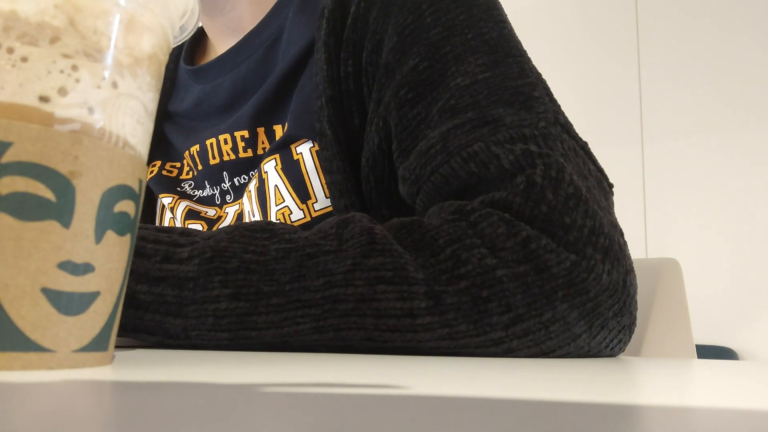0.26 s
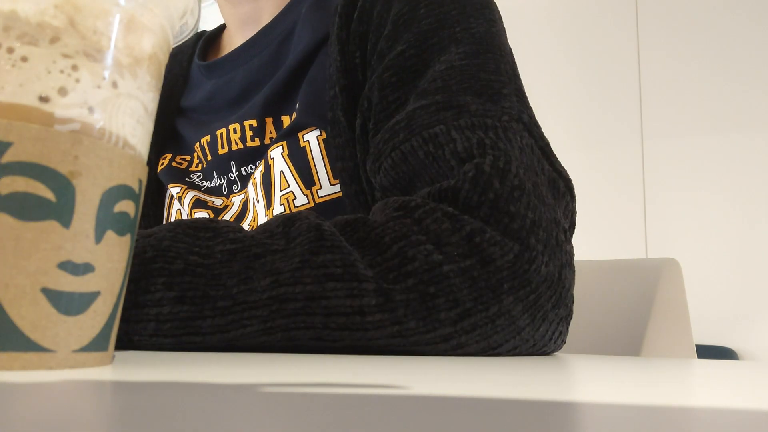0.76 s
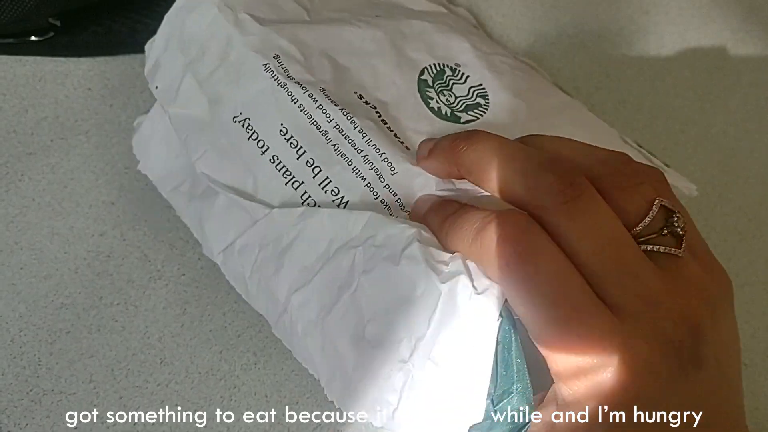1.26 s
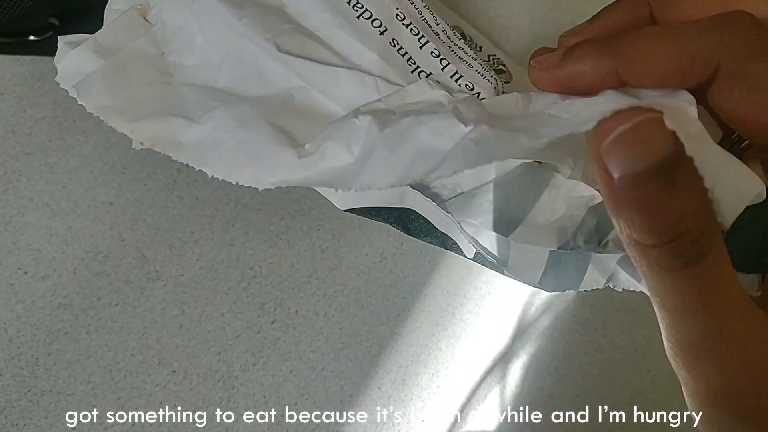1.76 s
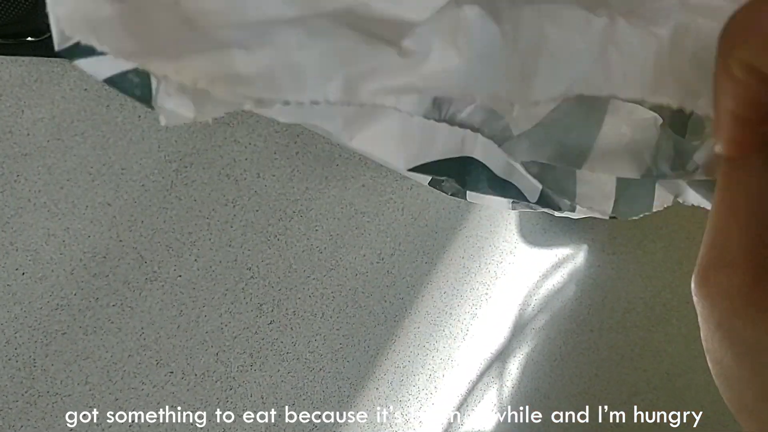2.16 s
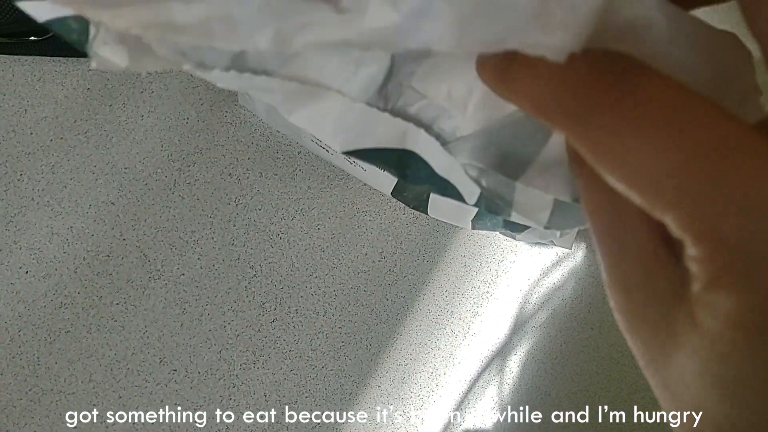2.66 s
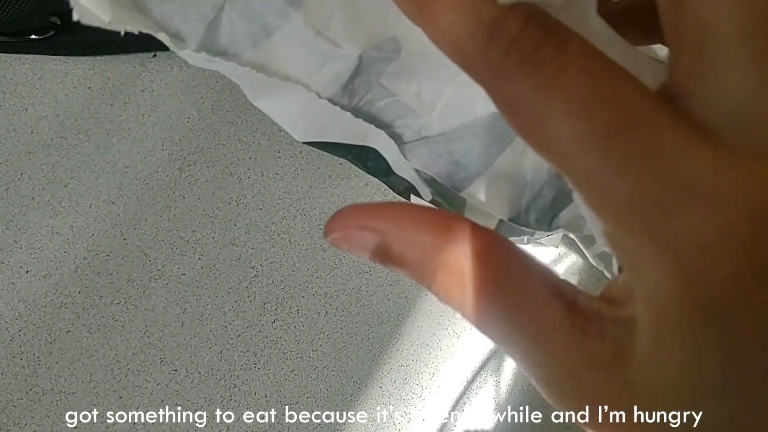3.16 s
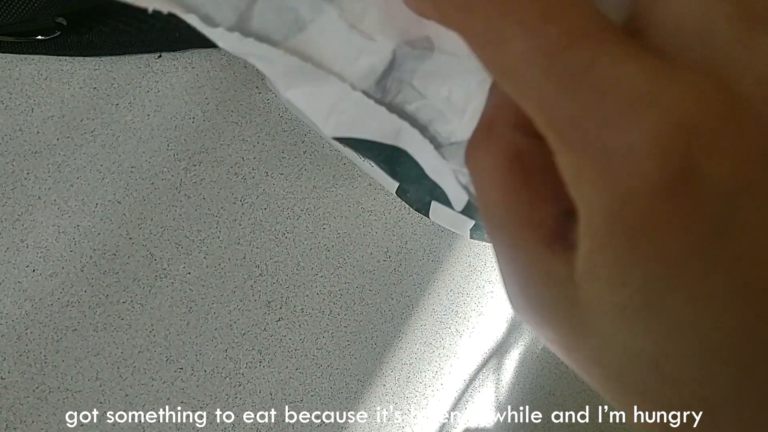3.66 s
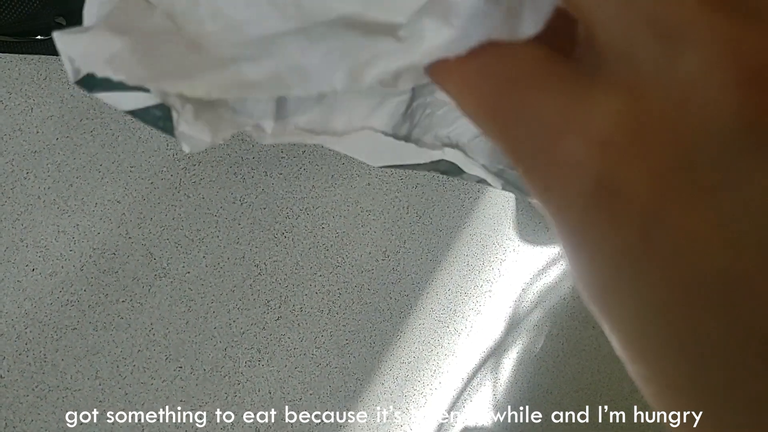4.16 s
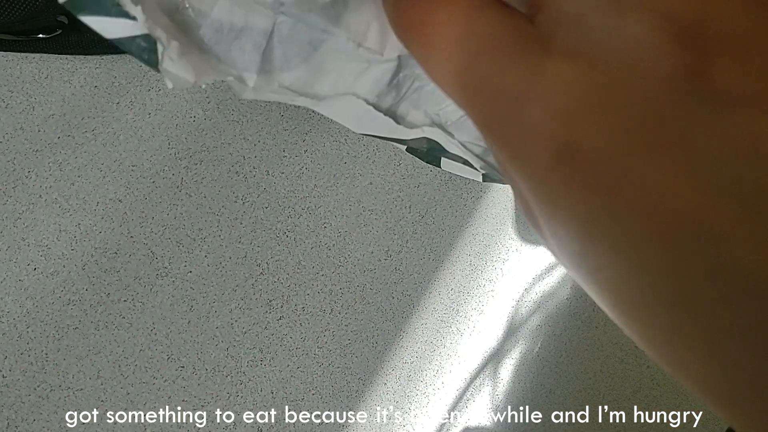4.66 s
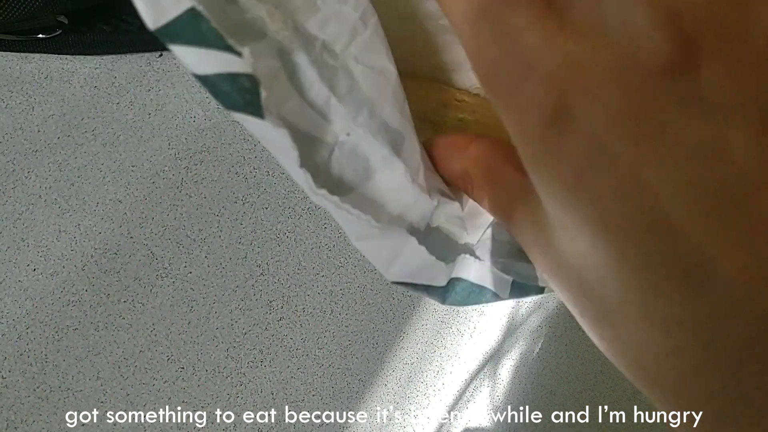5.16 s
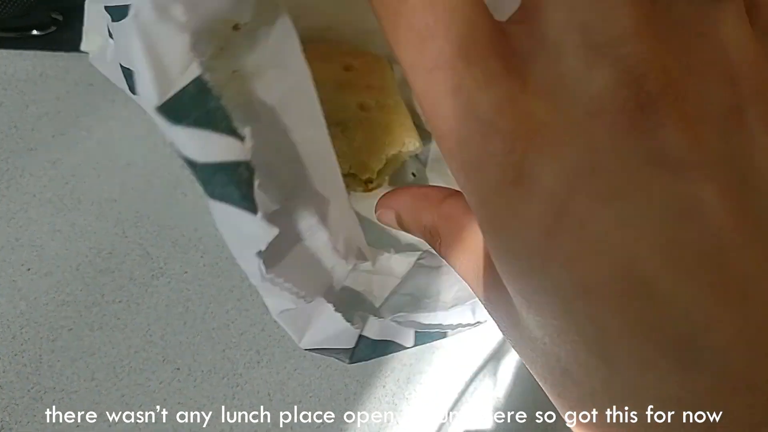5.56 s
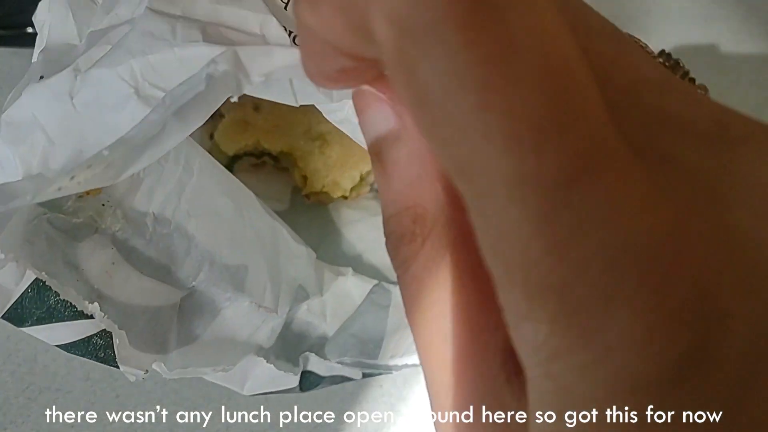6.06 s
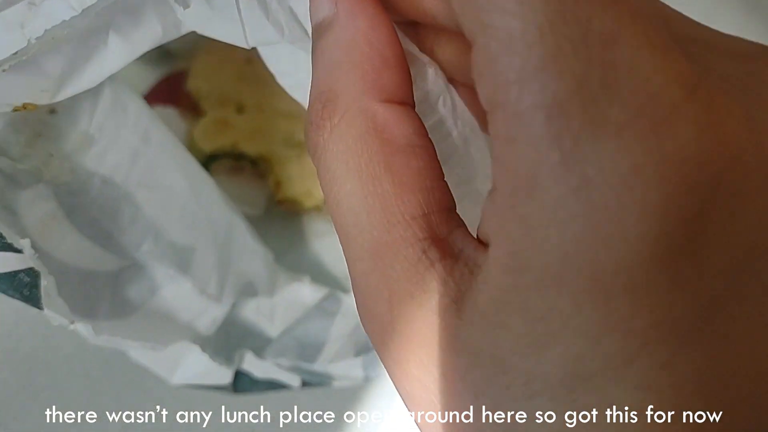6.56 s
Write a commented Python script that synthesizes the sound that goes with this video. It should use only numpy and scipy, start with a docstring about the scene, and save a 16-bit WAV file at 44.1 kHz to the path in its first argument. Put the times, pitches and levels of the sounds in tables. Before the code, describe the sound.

Quiet room air and a few faint taps, then a paper pastry bag crackles loudly in uneven bursts under working fingers, fading to soft rubs.

```python
"""A paper pastry bag is worked open by fingers on a table, close to a phone in a quiet office. Creases snap as
bright bursts and ring the panels beside them; fingers press the bag against the table in dull knocks. A rustle
of countless random buckles and sliding hiss follows the hand and dies away; soft strokes end it. Filtered room
noise and a few taps, ringing in short modes, come first; a low drone lies under the paper."""
import sys
import numpy as np
from scipy import signal
from scipy.fft import rfft, irfft
from scipy.io import wavfile
from scipy.ndimage import uniform_filter1d

SR = 44100
rng = np.random.default_rng(int(sys.argv[2]) if len(sys.argv) > 2 else 0)


def generate_wav(signal):
    """Clip the signal to [-1, 1] and save it as 16-bit WAV at the path in sys.argv[1]."""
    frames = np.transpose(np.atleast_2d(signal))
    scaled = np.clip(frames, -1, 1) * 32767
    pcm = np.round(scaled).astype(np.int16)
    wavfile.write(sys.argv[1], SR, pcm)


N = 299880
TIME_S = np.arange(N) / SR

# Ventilation and distant air. Each row: frequency in Hz, relative density in dB per Hz.
AIR_COLOUR = [(18, -74.5), (30, -51.5), (189, -24.5), (311, -7), (649, -6), (913, -10), (988, -11),
              (1960, -20.5), (2230, -20.5), (4530, -30), (16000, -34.5)]
# Difference between the channels of the air. Each row: frequency in Hz, gain in dB.
AIR_SIDE_COLOUR = [(10, -8.0), (110, -12.5), (250, -18.0), (700, -13), (2400, -5), (4400, 4.0), (22000, -3.5)]
AIR_DB, AIR_END_S = -64, 1.13
# Drone of the building. Each row: frequency in Hz, gain in dB.
HUM_COLOUR = [(30, -23.0), (70, -15.0), (90, -1), (190, -7), (400, -17.0)]

# Light taps at the table. Each row: start in seconds, level in dB.
TAPS = [(0.264, -61.5), (.425, -58.5), (0.9842, -46), (0.986, -48), (1.026, -55)]
# Modes of the tapped thing. Each row: frequency in Hz, relative level in dB, 60 dB decay time in seconds.
TAP_MODES = [(528, -8, .06), (834, -4.5, 0.062), (1506, 0, 0.051), (2280, -5, 0.069), (3180, -7, 0.0256),
             (3440, -11, 0.032)]

# Fingertip strokes on the paper. Each row: start in seconds, length in seconds, level in dB.
STROKES = [(6.25, 0.053, -70), (6.305, 0.033, -63.5), (6.365, 0.043, -62), (6.485, 0.026, -68.5),
           (6.55, .17, -78)]
# Colour of a stroke. Each row: frequency in Hz, gain in dB.
STROKE_COLOUR = [(400, -4), (2500, -7), (3100, -0.5), (3800, -5.5), (5000, -1.5), (6000, -7.5), (9500, -8),
                 (16000, -19)]

# Dull knocks as fingers push the bag against the table; the row at 2.24 s is the long ring of the panel #
# beside the loud crease there. Each row: start in seconds, level in dB before trim, centre in Hz.
KNOCKS = [(1.289, -43, 738), (1.34, -40.5, 810.0), (1.403, -37.5, 845), (1.467, -46.5, 850),
          (1.659, -43, 492), (1.679, -39, 676), (1.829, -49, 793), (2.24, -45, 1587), (2.244, -59, 487),
          (2.287, -44.5, 815), (2.428, -51.5, 400), (3.097, -52, 883), (3.605, -46.5, 476.4),
          (3.92, -49, 474), (3.95, -37.5, 540), (4.357, -53, 386), (4.816, -39, 639), (6.159, -57, 490)]

# Hand movements that crumple or slide the paper. Each row: start in seconds, length in seconds,
# sheet level in dB, crisp treble over the sheet in dB, table rumble over the sheet in dB (before trims).
SQUEEZES = [(1.12, 0.074, -53.5, -2.0, -12), (1.197, 0.1045, -49.5, -0.5, -15.0),
            (1.324, 0.15, -47.0, 2.5, -20.0), (1.467, 0.14, -50, -0.5, -16),
            (1.617, 0.18, -48.0, -0.5, -18), (1.806, 0.097, -49.5, 1.0, -18), (1.9, 0.13, -47, 5, -18),
            (2.059, 0.15, -47, 2, -22.5), (2.205, 0.077, -46.0, 6.0, -16.5), (2.302, 0.16, -56, -5, -18),
            (2.408, 0.11, -52.0, 2.0, -15), (2.562, 0.11, -64.0, 1.5, -8), (2.655, 0.11, -56, 1, -12.0),
            (2.776, 0.064, -46.0, 2.5, -11), (2.91, 0.071, -47.0, 1.5, -11.5),
            (2.978, 0.068, -42.5, 1.0, -17.0), (3.077, 0.04, -48, -1, -14),
            (3.134, 0.163, -56.0, -1.5, -20), (3.291, 0.25, -50, 7.5, -15),
            (3.561, 0.039, -52.5, 8.5, -11.5), (3.665, 0.056, -51.0, 9.0, -16),
            (3.75, 0.065, -49.5, 5.5, -13), (3.797, 0.089, -56, -6.0, -11), (3.892, 0.11, -51.5, 0.0, -13),
            (4.012, 0.1, -52.0, 7.0, -13.5), (4.193, 0.13, -61.5, 3, -8), (4.326, 0.032, -52.0, 2.0, -8.5),
            (4.427, 0.15, -71, 0, -2), (4.54, 0.063, -57, 12.5, -11.5), (4.637, 0.13, -54.0, 5.0, -11),
            (4.807, 0.036, -43.0, 2.5, -16), (4.894, 0.075, -50, -4.5, -14.5),
            (4.963, 0.23, -43.5, 4.0, -14.5), (5.169, 0.12, -41.5, 8.0, -12),
            (5.304, 0.14, -44.5, 4.5, -13.5), (5.463, 0.166, -56, 5, -9.5), (5.624, 0.04, -50.0, 4.5, -8.5),
            (5.694, 0.23, -67, 14, -12), (5.91, 0.18, -69, 6.5, -10), (6.108, 0.059, -65.5, 1, -5)]
# Each movement takes hold quickly, builds a little, then the paper settles.
ATTACK_S, BUILD_DB, SETTLE_DB_PER_S = .028, 2.5, 210
# Colours of the three parts of the rustle. Each row: frequency in Hz, gain in dB.
CRISP_COLOUR = [(2500, -14.5), (4000, -7), (5500, -7), (8600, 0), (11000, -2), (13500, -7.5), (16000, -9.5)]
SHEET_COLOUR = [(280, -12.5), (500, 1), (670, -5.5), (870, 0.5), (1200, -3.5), (1750, -1.5), (2750, -1.5),
                (3500, -9.5), (5500, -22)]
RUMBLE_COLOUR = [(25, -22), (60, -11), (92, 1), (170, -0.5), (235, 3.5), (350, 2.5), (450, -4), (750, -20)]

# Small creases that give way at random.
CREASES_PER_S, CREASES_FROM_S, CREASES_TO_S = 45, 1.14, 5.72
# Loudest creases. Each row: start in seconds, crack level in dB and panel level in dB (before trims),
# panel centre in Hz, left minus right in dB (the panel takes half of it).
SNAPS = [(1.1197, -65, -50, 4150, 2), (1.1353, -52, -42.5, 2320, 8), (1.1515, -42, -48, 1510, -1),
         (1.1694, -42, -59, 1810, 7), (1.1867, -41.5, -52, 2630, 6), (1.2543, -35.5, -63, 1210, -2),
         (1.2775, -29, -36, 1300, 6), (1.34, -31.5, -40, 1450, 3), (1.372, -43, -38, 2200, -1),
         (1.3913, -46, -32, 2230, 9), (1.4036, -28.5, -40, 1250, 2), (1.4648, -37.5, -55, 1700, -13),
         (1.6502, -56, -43, 1965, 13), (1.6605, -32.5, -37.5, 3050, 9), (1.6788, -34, -35.5, 1840, 3),
         (1.7417, -44, -39.5, 3240, 1), (1.7875, -40, -56, 2260, 6), (1.802, -38, -45, 2700, 4),
         (1.8294, -46.5, -36.5, 2520, 23), (1.862, -34.5, -45, 1650, 6), (1.8829, -34.5, -41, 1930, 4.5),
         (1.9244, -38.5, -59, 2440, 6), (1.9554, -30.5, -43, 1820, 8), (1.9611, -30.5, -43.5, 2430, -1),
         (2.0149, -36.5, -42, 1830, -4), (2.0998, -38, -39, 2160, 27), (2.1068, -33, -47, 2119, -3),
         (2.2144, -32, -45, 1850, 4), (2.2434, -27, -25, 1805, -3), (2.2529, -31, -42.5, 1910, 14.5),
         (2.5205, -35.5, -41.5, 2460, 7), (2.589, -41, -44.5, 2597, 2), (2.714, -42, -48.5, 2620, 8.5),
         (2.741, -46, -68, 1800, 4), (2.8428, -35, -46, 1920, 11), (2.8496, -34, -45, 2320, 16),
         (2.856, -33, -48, 1840, 1), (3.0559, -30.5, -36, 1090, 16), (3.094, -31.5, -33, 1471, 12),
         (3.315, -36, -44, 2500, 9), (3.3379, -43, -40, 1459, 12), (3.3514, -27.5, -40.5, 2018, 3),
         (3.374, -26.5, -39, 2080, 8), (3.383, -35, -48.5, 3100, 6), (3.3961, -29.5, -44, 2580, 4),
         (3.481, -31, -35.5, 3500, 10), (3.5007, -33, -41.5, 2248, 6), (3.509, -39, -38, 2640, 17),
         (3.536, -30.5, -46, 1994, 6), (3.577, -36.5, -50, 2296, 10), (3.6062, -38, -56, 2328, 12),
         (3.645, -33.5, -47, 2654, 10), (3.6536, -32.5, -47, 1652, 5), (3.7475, -40, -54, 1880, 13),
         (3.7723, -34.5, -39, 3181, 8), (3.8075, -33.5, -44, 2383, 9), (3.92, -49, -47, 1491, 6),
         (3.9466, -41.5, -35, 1625, 10.5), (4.067, -40.5, -60, 2400, 11), (4.147, -41.5, -51, 2703, 12),
         (4.3024, -43.5, -44, 1613, 5), (4.3433, -36, -46, 2113, 9), (4.358, -37.5, -40, 1653, 5),
         (4.4591, -46.5, -60.5, 1640, 3), (4.5852, -35.5, -49, 2820, 15), (4.648, -36, -64, 2714, 11.5),
         (4.6614, -40, -44.5, 2460, 10), (4.6894, -35, -52, 1559, 7), (4.721, -34.5, -46.5, 1975, 7),
         (4.8158, -38, -31.5, 1797, 2), (4.8352, -34.5, -52, 1430, 10), (4.9969, -32.5, -38, 2924, 3),
         (5.0095, -29, -42, 2299, 13), (5.0495, -28.5, -35, 2831, 7), (5.0941, -35, -35.5, 3270, 9),
         (5.1395, -32, -38.5, 2435, 12), (5.216, -27, -41, 1942, 12), (5.258, -26.5, -36, 2250, 8),
         (5.2798, -30, -42, 1720, 3), (5.313, -32.5, -39, 2630, 0), (5.3378, -33, -36.5, 2720, 6),
         (5.357, -31, -35, 1636, 11.5), (5.3654, -34.5, -40, 1960, 3), (5.3859, -36, -40, 3700, -1),
         (5.4048, -28.5, -35, 2310, 9), (5.4212, -44, -31.5, 3413, -3), (5.432, -34.5, -39, 1560, 4),
         (5.4448, -30.5, -39, 2340, 11), (5.4906, -36, -35.5, 1610, 13), (5.5011, -32, -48.5, 2732, 6),
         (5.5288, -34.5, -42.5, 1688, 8), (5.5685, -40, -42.5, 2830, 12), (5.6232, -36.5, -50, 1831, 17),
         (5.7974, -39.5, -75, 3140, 10), (5.8383, -43.5, -63, 2520, 11), (5.857, -39.5, -70, 2810, 9),
         (6.0758, -70.5, -52.5, 2590, 8), (6.1604, -48.5, -64, 1210, 10)]
# A tight crease moves little paper and cracks higher; CRACK_HZ is for crack and panel equally loud.
CRACK_HZ, CRACK_OCT_PER_DB, CRACK_SCATTER_OCT = 7990, 0.02, .07

PORT_LAG_SAMPLES = 7
TOP_HZ = 16100


def undb(db):
    """Decibels to gain."""
    return 10 ** (np.asarray(db) / 20)


def unit(x):
    """Scale to rms 1 over all channels."""
    return x / np.sqrt(np.mean(x ** 2) + 1e-20)


def colour(x, points):
    """Filter by a spectrum of (Hz, dB) points; outside them -60 dB."""
    points_hz, points_db = np.transpose(points)
    size = x.shape[-1]
    hz = np.arange(size // 2 + 1) * SR / size
    gain_db = np.interp(np.log(hz + 1), np.log(points_hz), points_db, left=-60, right=-60)
    return irfft(rfft(x) * undb(gain_db), size)


def resonate(x, hz, q):
    """One broad resonance, applied twice for steep skirts."""
    top_hz = .4 * SR
    b, a = signal.iirpeak(min(hz, top_hz), max(q, hz / top_hz), SR)
    return signal.lfilter(b, a, signal.lfilter(b, a, x))


def pan(left_minus_right_db):
    """Left and right gains of constant power."""
    return unit(undb(np.array([[left_minus_right_db], [-left_minus_right_db]]) / 2))


def add(out, start_s, x):
    """Mix x into out from start_s."""
    i = int(start_s * SR)
    out[:, i:i + x.shape[1]] += x[:, :N - i]


def burst_level(x, db, size=256):
    """Give each channel of a burst the energy of 6 ms at db."""
    return x * undb(db) * np.sqrt(size / np.sum(x ** 2, axis=1, keepdims=True))


def flutter(rise_s, decay_s, likeness, size=1024):
    """Bending waves scatter through creased paper: a short noisy burst that reaches the left port first."""
    t = np.arange(size) / SR
    noise = rng.standard_normal((3, size))
    share = np.clip(likeness, 0, 1)  # power common to both ports
    pair = share ** .5 * noise[0] + (1 - share) ** .5 * noise[1:]
    left, right = pair * (1 - np.exp(-t / rise_s)) ** 2 * np.exp(-t / decay_s)
    return np.array([left, np.roll(right, PORT_LAG_SAMPLES)])


def movement(start_s, length_s, db):
    """Amplitude of one movement of the hand: attack, a building hold, release."""
    t = TIME_S - start_s
    build_db = BUILD_DB * (np.clip(t / length_s, 0, 1) - .5)
    settle_db = SETTLE_DB_PER_S * np.maximum(t - length_s, 0)
    return np.clip(t / ATTACK_S, 0, 1) * undb(db + build_db - settle_db)


def effort(moves):
    """Level in dB of overlapping movements (start, length, dB); their powers add."""
    return 10 * np.log10(sum(movement(*move) ** 2 for move in moves) + 1e-16)


def air(after_db=-27):
    """Soft ventilation noise, alike in both channels in the bass; it drops away as the paper starts."""
    mid, side = rng.standard_normal((2, N))
    side = colour(side, AIR_SIDE_COLOUR)
    noise = unit(colour(mid + side * np.array([[1], [-1]]), AIR_COLOUR))
    return noise * undb(AIR_DB + np.interp(TIME_S, [AIR_END_S, AIR_END_S + 0.079], [0, after_db]))


def hum(hum_db=-77.0):
    """A low noisy drone of the building lies under the paper, from the time the air drops."""
    drone = unit(colour(rng.standard_normal((1, N)), HUM_COLOUR))
    return drone * undb(hum_db) * (TIME_S > AIR_END_S) * pan(2)


def taps(size=8192):
    """Small knocks ring a few short modes, with a dry tick and no bass."""
    out, t = np.zeros((2, N)), np.arange(size) / SR
    high_pass = signal.butter(2, 330, "high", fs=SR)
    for start_s, db in TAPS:
        ring = np.zeros((2, size))
        for hz, mode_db, t60_s in TAP_MODES:
            phase = rng.normal(0, 1, (2, 1))
            ring += undb(mode_db - 60 * t / t60_s) * np.sin(2 * np.pi * hz * t + phase)
        tick = resonate(rng.standard_normal((2, size)) * np.exp(-t / 0.0018), 2600, q=0.88)
        add(out, start_s, burst_level(signal.lfilter(*high_pass, ring + 6 * tick), db))
    return out


def stroke():
    """Skin sliding over paper gives a soft, even swish."""
    swish = unit(colour(rng.standard_normal((2, N)), STROKE_COLOUR))
    return swish * undb(effort(STROKES)) * pan(4.13)


def knocks(trim_db=1.5):
    """Fingers push the bag against the table: a dull papery knock."""
    out = np.zeros((2, N))
    for start_s, db, hz in KNOCKS:
        knock = resonate(flutter(rise_s=.0006, decay_s=0.0048, likeness=0.99), hz, q=.85)
        add(out, start_s, burst_level(knock, db + trim_db) * pan(2.0))
    return out


def buckles(rate_per_s, spread_db, decay_s, likeness, slide_db, centre_hz, count=20):
    """Tiny buckles of very unequal size, on facets that each have their own pitch, above the hiss of sliding paper."""
    out = np.zeros((2, N))
    for octave in np.linspace(-1, 1, count):
        pops = np.zeros(N)
        at = np.flatnonzero(rng.random(N) < rate_per_s / count / SR)
        size_db = spread_db * np.minimum(rng.exponential(size=len(at)), 2)
        pops[at] = undb(size_db) * rng.choice([-1, 1], len(at))
        burst = flutter(rise_s=0.00066, decay_s=decay_s, likeness=likeness)
        facet = resonate(burst, centre_hz * 2 ** octave, q=1.84) + 0.16 * burst
        facet = burst_level(facet, 0) * pan(3 * rng.standard_normal())
        out += signal.oaconvolve(pops[None], facet, axes=1)[:, :N]
    # even out the loudness over about 60 ms, so that no chance buckle stands out
    local_power = uniform_filter1d(np.mean(out ** 2, axis=0), size=2600)
    out /= np.sqrt(local_power + 0.033 * local_power.mean())
    slide = undb(slide_db)
    return (out + slide * rng.standard_normal((2, N))) / np.sqrt(1 + slide ** 2)


def crease(crack_db, panel_db, panel_hz, side_db):
    """A crease pops through with a bright crack; the panel beside it rings, the longer the lower it is."""
    octaves = CRACK_OCT_PER_DB * (crack_db - panel_db) + CRACK_SCATTER_OCT * rng.standard_normal()
    crack_decay_s = 0.0013 * undb(rng.standard_normal())
    crack = flutter(rise_s=0.00036, decay_s=crack_decay_s, likeness=0.046)
    crack = resonate(crack, CRACK_HZ * 2 ** octaves, q=1.22)
    panel = flutter(rise_s=0.00059, decay_s=0.0013 + 0.57 / panel_hz, likeness=0.67)
    panel = resonate(panel, panel_hz, q=0.953)
    return burst_level(crack, crack_db) * pan(side_db) + burst_level(panel, panel_db) * pan(.5 * side_db)


def small_creases(crisp_db, sheet_db, crack_db=-3.0, panel_db=-6.5, scatter_db=3.0, panel_hz=2100, side_db=5):
    """Lesser creases tick between the big ones, as loud as the hand is working."""
    out = np.zeros((2, N))
    for slot_s in np.arange(CREASES_FROM_S, CREASES_TO_S, 1 / CREASES_PER_S):
        start_s = slot_s + rng.random() / CREASES_PER_S
        size, pitch, side = np.clip(rng.standard_normal(3), -2, 2)
        i, size_db = int(start_s * SR), scatter_db * size
        tick = crease(crisp_db[i] + crack_db + size_db, sheet_db[i] + panel_db + size_db,
                      panel_hz * 2 ** (.4 * pitch), side_db + 4 * side)
        add(out, start_s, tick)
    return out


def rustle(crisp_trim_db=-0.96, sheet_trim_db=-0.63, rumble_trim_db=0.3):
    """Harder handling makes more buckles a second and louder creases; at the end the fingers mostly slide."""
    start_s, length_s, level_db, treble_db, bass_db = np.transpose(SQUEEZES)
    sheet_db = effort(zip(start_s, length_s, level_db))
    crisp_db = effort(zip(start_s, length_s, level_db + treble_db))
    rumble_db = effort(zip(start_s, length_s, level_db + bass_db))
    rate_per_s = 850 * undb(.25 * (crisp_db + 45))
    slide_db = np.interp(TIME_S, [5.6, 5.8], [-1, 8])
    fine = buckles(rate_per_s, spread_db=7.5, decay_s=0.0015, likeness=0.057,
                   slide_db=slide_db, centre_hz=8060)
    broad = buckles(rate_per_s, spread_db=4.5, decay_s=0.0018, likeness=0.8,
                    slide_db=slide_db - 3.5, centre_hz=1423.0)
    sway = broad + 0.27 * broad.mean(axis=0)  # the lowest sway is more alike at both ports
    crisp = unit(colour(fine, CRISP_COLOUR)) * undb(crisp_db + crisp_trim_db) * pan(5.4)
    sheet = unit(colour(1.7 * fine + broad, SHEET_COLOUR)) * undb(sheet_db + sheet_trim_db) * pan(2.6)
    rumble = unit(colour(sway, RUMBLE_COLOUR)) * undb(rumble_db + rumble_trim_db) * pan(3.8)
    return crisp + sheet + rumble + small_creases(crisp_db, sheet_db)


def snaps(crack_trim_db=0.8, panel_trim_db=0.74):
    """The big creases, one by one, each a crack with its panel."""
    out = np.zeros((2, N))
    for start_s, crack_db, panel_db, panel_hz, side_db in SNAPS:
        add(out, start_s, crease(crack_db + crack_trim_db, panel_db + panel_trim_db, panel_hz, side_db))
    return out


def table_bounce(x, share=0.33, moves_per_s=9):
    """The table returns the paper's sound a moment later; as the bag moves the delay wanders and the colour shifts."""
    steps_s = np.arange(0, TIME_S[-1] + 1, 1 / moves_per_s)
    bounced = []
    for side in x:
        delay_s = np.interp(TIME_S, steps_s, rng.uniform(.00015, .0008, len(steps_s)))
        bounced.append(np.interp(TIME_S - delay_s, TIME_S, side))
    return (x + share * np.array(bounced)) / np.sqrt(1 + share ** 2)


def office(x, t60_s=0.087, wet_db=-16, size=16384):
    """Table, hands and walls return a short diffuse tail, weak in the top treble."""
    t = np.arange(size) / SR
    decay = undb(-60 * t / t60_s) * (1 + 5 * np.exp(-t / 0.0081)) * (t > .002)
    tail = signal.lfilter(*signal.butter(1, 7000, fs=SR), rng.standard_normal((2, size)) * decay)
    return x + undb(wet_db) * signal.oaconvolve(x, unit(tail) / np.sqrt(size), axes=1)[:, :N]


def scene():
    """Paper and taps in the room, over its air and drone."""
    paper = table_bounce(snaps() + rustle())
    return air() + hum() + office(knocks() + stroke() + taps() + paper)


def record(dry):
    """The phone cuts the top with a steep low-pass."""
    return signal.sosfilt(signal.ellip(10, .2, 80, TOP_HZ, fs=SR, output="sos"), dry)


dry = scene()
out = record(dry)
generate_wav(out)
```